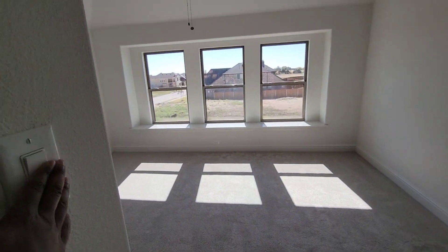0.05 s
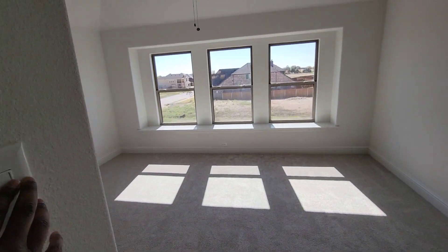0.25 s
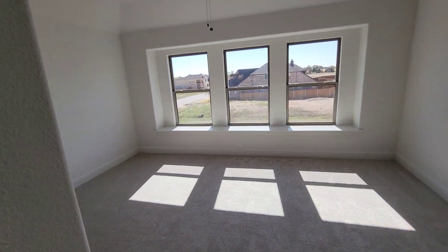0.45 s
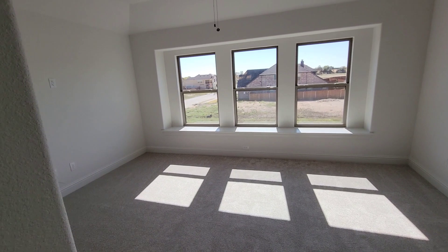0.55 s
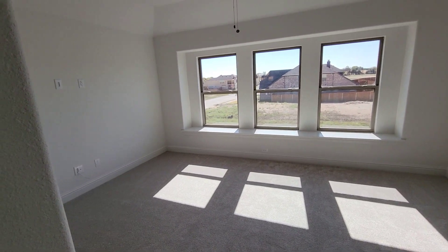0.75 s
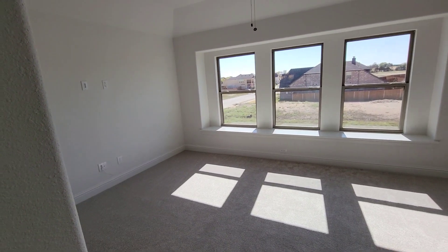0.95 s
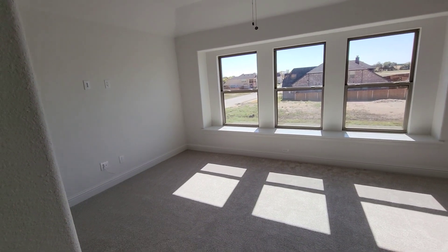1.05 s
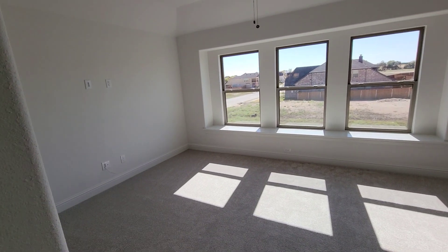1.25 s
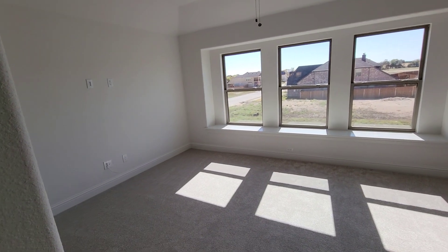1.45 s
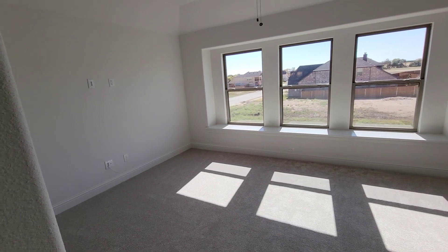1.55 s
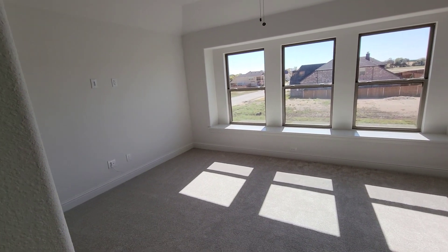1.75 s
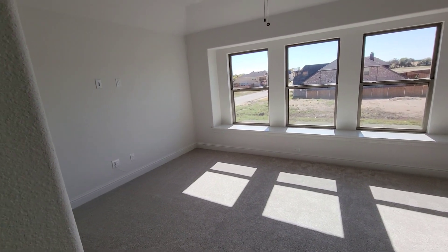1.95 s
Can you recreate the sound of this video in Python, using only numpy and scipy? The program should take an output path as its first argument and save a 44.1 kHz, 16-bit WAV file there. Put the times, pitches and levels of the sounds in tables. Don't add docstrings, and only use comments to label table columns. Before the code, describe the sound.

A plastic rocker light switch clicks twice, close to a handheld phone. Light finger and nail taps at 0.09 to 0.16 seconds lead into a brief rubbing creak and a sharp snap with rapid bounces at 0.20. The echo fades through the bare house over faint low rumble and hiss. After a fainter creak, a second bright snap lands at 1.62 and rings on.

```python
import sys
import numpy as np
from scipy import signal
from scipy.fft import rfft, irfft
from scipy.io import wavfile
from scipy.ndimage import uniform_filter1d

SR = 44100
rng = np.random.default_rng(int(sys.argv[2]) if len(sys.argv) > 2 else 0)


def ratio(d):
    e = np.asarray(d, float) / 20
    return 10 ** e


def materialize(psi):
    bounded = np.clip(np.atleast_2d(psi).T, -1, 1)
    quanta = np.round(bounded * 32767).astype(np.int16)
    wavfile.write(sys.argv[1], SR, quanta)


N = 88200
LEAD_S = 0.4


def butter(x, order, hz, kind):
    return signal.sosfilt(signal.butter(order, hz, kind, fs=SR, output="sos"), x)


def curve(rows, hz, col=1):
    rows = np.array(rows, float)
    return np.interp(np.log(np.maximum(hz, 1)), np.log(rows[:, 0]), rows[:, col])


def ring(modes, phases):
    attack_s = 0.0001
    t = np.arange(SR // 5)[:, None] / SR
    hz, db, t60_s = np.array(modes, float).T
    decay = ratio(db - 60 * t / np.maximum(t60_s, 0.002))
    wave = np.sin(2 * np.pi * hz * t + 0.79 * phases[:len(hz)]) * decay
    return wave.sum(axis=1) * np.minimum(t[:, 0] / attack_s, 1) / 3


def contact_crack(noise):
    t60_s, low_hz, high_hz = 0.0033, 1200, 11700
    burst = np.sign(noise) * ratio(-60 * np.arange(len(noise)) / SR / t60_s)
    return butter(burst, 1, [low_hz, high_hz], "band")


def knocks(size):
    # (time [s], level [dB], body [0 down stop, 1 up stop, 2 plate, 3 fingernail, 4 far tick; rounded],
    #  lag of right port [ms])
    hits = [(.0887, -32, 2, 0.26), (.0965, -40, 2, 0.37), (.104, -45.5, 3.5, .4), (.1318, -36, 3, 0.27),
            (0.1365, -40.5, 3, .4), (0.14, -44.5, 3, .4), (0.16, -54, 3, 0.77), (0.202, -33, 0, 0.16),
            (.2037, -5, 0, 0.3), (0.204, -9.5, 0, 0.16), (0.2071, -13, 0, 0.5), (.2093, -12.5, 0, .4),
            (0.2129, -13, 0, 0.34), (.965, -59, 4, 0.068), (1.6155, -14, 1, .4), (1.6166, -1.5, 1, .4),
            (1.6174, -7, 1, 0.66), (1.618, -11.5, 1, 0.28), (1.625, -14, 1, 0.92), (1.6262, -22.5, 1, 0.44)]
    # (frequency [Hz], level [dB], t60 [s])
    down_stop = [(178, -11, 0.02), (542, -16.5, 0.11), (770, -14.5, 0.025), (930, -11.5, .03),
                 (1897, -2.5, 0.031), (2500, -4.5, .006), (3216, -4.5, .01), (4000, 0.5, 0.013),
                 (5130, -6, .006), (6770, -1.5, 0.008), (7260, -1.5, .012), (9800, -1.5, .004),
                 (11340, -1, .005), (14040, -6, .004)]
    # (frequency [Hz], level [dB], t60 [s])
    up_stop = [(101, -24.5, 0.079), (292, -29, 0.094), (518.5, -19, 0.19), (1021, -16.5, 0.017),
               (1835, -5, 0.029), (2206, -2.5, 0.013), (2739, -4, 0.014), (3720, -17, 0.0075),
               (4650, -2, 0.0044), (6670, -10, 0.012), (7100, -3, 0.0073), (9570, -9.5, 0.0032),
               (13230, -5, 0.0054), (14300, -13, .004)]
    # (frequency [Hz], level [dB], t60 [s])
    plate = [(203, -17, 0.016), (534, -13.5, 0.028), (900, -4, .06), (1838, -10, .03), (2440, -9, 0.025),
             (3330, 5, 0.011), (3600, -8.5, .015), (5205, -10.5, 0.013), (6600, -12.5, .012),
             (12500, -20, .004)]
    # (frequency [Hz], level [dB], t60 [s])
    nail = [(850, -12, .04), (1900, -8, .025), (2496, -2.5, 0.03), (3187, -1.5, 0.022), (3700, -1, 0.026),
            (4530, -3.5, .015), (5300, -6, .02), (6800, -12.5, .01), (12000, -22.5, .004)]
    # (frequency [Hz], level [dB], t60 [s])
    far_tick = [(910, 3.5, .06), (1400, -4, .03)]
    crack_db = [
        -1,
        -4.5,
        -16,
        -10.5,
        -40,
    ]
    soft_loss = 0.79
    bodies = (down_stop, up_stop, plate, nail, far_tick)
    out = np.zeros((2, size))
    chance = rng.standard_normal((len(hits), 400))
    for (s, db, body, lag_ms), noise in zip(hits, chance):
        body = int(round(body))
        hardest_db = max(hit[1] for hit in hits if round(hit[2]) == body)
        wave = ratio(db) * ring(bodies[body], noise)
        level_db = db + crack_db[body] + soft_loss * (db - hardest_db)
        wave[:len(noise)] += ratio(level_db) * contact_crack(noise[::-1])
        for port in (0, 1):
            at = int((s + LEAD_S + port * lag_ms / 1000) * SR)
            out[port, at:at + len(wave)] += wave
    return out


def creaks(size):
    # (snap time [s], level at the end [dB], rise [dB/ms], centre [Hz], left over right [dB])
    rubs = [
        (.2033, -33, 1.65, 8000, 17),
        (1.6153, -43, 0.8, 4000, 0.5),
    ]
    t = np.arange(size) / SR - LEAD_S
    out = np.zeros((2, size))
    for s, db, rise, centre_hz, pan_db in rubs:
        band_hz = [centre_hz / 3, min(centre_hz * 2, 19000)]
        rub = butter(rng.standard_normal(size), 1, band_hz, "band")
        rub = rub * ratio(db + np.minimum(t - s, 0) * 1000 * rise) * (t < s)
        late = np.roll(rub, 18)
        out += np.array([rub * ratio(pan_db / 2), late * ratio(-pan_db / 2)])
    return out


def switch(size):
    # (frequency [Hz], left over right [dB])
    shadow = [(200, -.5), (2000, -.5), (6000, 0), (10500, 7), (14500, -1)]
    lean_db = curve(shadow, np.fft.rfftfreq(size, 1 / SR)) / 2
    direct = knocks(size) + creaks(size)
    return irfft(rfft(direct) * ratio(np.array([lean_db, -lean_db])), size)


def wall_snaps(size):
    # (time [s], level [dB], tilt [dB/octave], droop around 2.5 kHz [dB/octave^2])
    snaps = [
        (-.1, -21.5, -3.24, 0.15),
        (0.0884, -29.5, -.6, 7),
        (0.1313, -26.5, -2.1, 6),
        (0.2035, -0.26, 0.85, 0.72),
        (1.6155, -4.5, -0.64, 0.92),
    ]
    f = np.fft.rfftfreq(size, 1 / SR)
    octaves = np.log2((f + 30) / 2500)
    spectrum = 0
    for s, db, tilt, droop in snaps:
        level = ratio(db + tilt * octaves - abs(droop) * octaves ** 2)
        spectrum = spectrum + level * np.exp(-2j * np.pi * f * (s + LEAD_S))
    return irfft(spectrum, size)


def diffuse_bands(size):
    ports_m, most_alike = 0.13, 0.9
    f = np.fft.rfftfreq(size, 1 / SR)
    alike = most_alike * np.sinc(2 * f * ports_m / 343)
    mid, side = rfft(rng.standard_normal((2, size)))
    mid = mid * np.sqrt((1 + alike) / 2)
    side = side * np.sqrt((1 - alike) / 2)
    pair = np.array([mid + side, mid - side])
    for step in np.arange(28):
        hz = 28 * 2 ** (step / 3)
        thirds = np.clip(3 * np.log2((f + 1) / hz), -1, 1)
        yield hz, irfft(pair * np.cos(np.pi / 2 * thirds) ** 2, size)


def rooms():
    # (frequency [Hz], near level [dB], near t60 [s], house level [dB], house t60 [s])
    decays = [(60, -12.5, .4, -20.5, 0.96), (150, -14.5, 0.14, -13.5, 1.3), (430, -14, 0.27, -30, 1.4),
              (1200, -17.5, 0.13, -38.5, 1.376), (2580, -15, 0.15, -29.5, 0.94),
              (7400, -19.5, .18, -37, 0.83), (8600, -25.5, 0.11, -39, 0.6),
              (15000, -24.5, 0.14, -41.5, .45)]
    first_echo_s, build_s = 0.0015, 0.004
    size = int(1.6 * SR)
    t, out = np.arange(size) / SR, 0
    for hz, band in diffuse_bands(size):
        near = ratio(curve(decays, hz, 1) - 60 * t / curve(decays, hz, 2))
        house = ratio(curve(decays, hz, 3) - 60 * t / curve(decays, hz, 4))
        out = out + band * (near + house)
    return out * np.clip((t - first_echo_s) / build_s, 0, 1)


def walk(rate_hz, size):
    k = int(SR / rate_hz)
    x = np.repeat(rng.standard_normal(size // k + 1), k)
    x = uniform_filter1d(uniform_filter1d(x, k), k)[:size]
    return x / x.std()


def rumble():
    # (frequency [Hz], density [dB/Hz])
    density = [(25, -16.5), (60, 0.5), (140, -8.5), (290, -26), (1200, -40.5), (2300, -50), (7600, -50),
               (9000, -59)]
    level_db, swell_db, flicker_db = -57.5, -1.5, 1.5
    out, swell = 0, walk(4.0, N)
    for hz, band in diffuse_bands(N):
        out = out + band * ratio(curve(density, hz) + swell_db * swell + flicker_db * walk(13, N))
    return out * ratio(level_db) / np.sqrt(np.mean(out.mean(axis=0) ** 2))


def scene():
    ring_to_room_db, bass_cut_hz = -24, 70
    lead = int(LEAD_S * SR)
    size = N + lead
    near = switch(size)
    send = wall_snaps(size) + ratio(ring_to_room_db) * butter(near[:1], 2, 1200, "high")
    echo = signal.fftconvolve(send, rooms(), axes=1)[:, :size]
    clicks = butter(near + echo, 2, bass_cut_hz, "high")
    return clicks[:, lead:] + rumble()


def top_cut(x):
    return signal.sosfilt(signal.butter(12, 16840, fs=SR, output="sos"), x)


def record(dry):
    top_hz, hush_hz, hush_db = 15800, 1600, -5
    from_s, to_s = 0.97, 1.59
    t = np.arange(N) / SR
    dry = signal.sosfilt(signal.ellip(6, 0.5, 50, top_hz, fs=SR, output="sos"), dry)
    treble = signal.sosfiltfilt(signal.butter(2, hush_hz, "high", fs=SR, output="sos"), dry)
    hush = np.interp(t, [from_s - 0.03, from_s + 0.03, to_s - 0.01, to_s], [0, 1, 1, 0])
    hushed = dry + (ratio(hush_db * hush) - 1) * treble
    mix = np.tanh(hushed * 0.89) / 0.72
    return top_cut(mix)


dry = scene()
out = record(dry)
materialize(out)
```